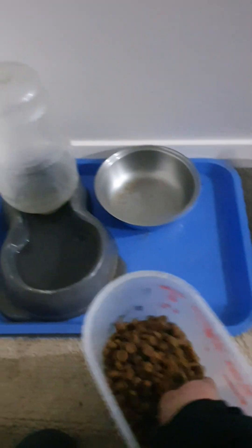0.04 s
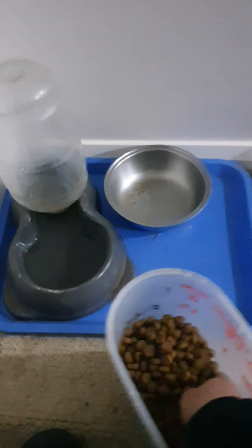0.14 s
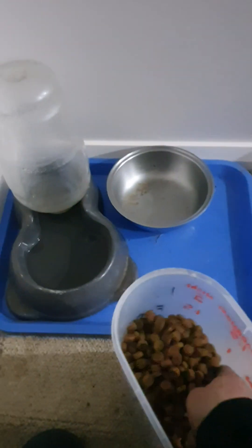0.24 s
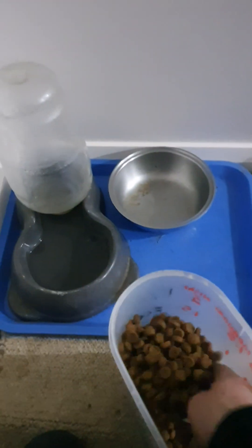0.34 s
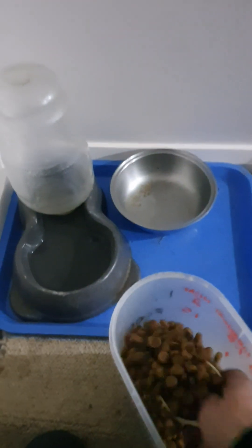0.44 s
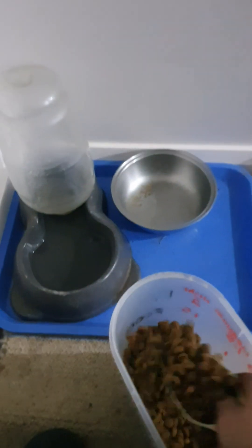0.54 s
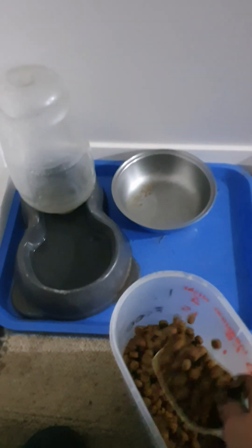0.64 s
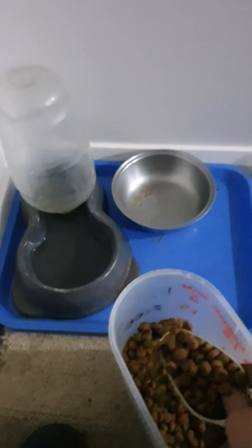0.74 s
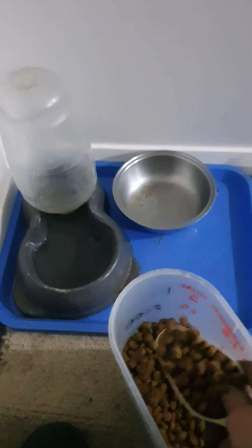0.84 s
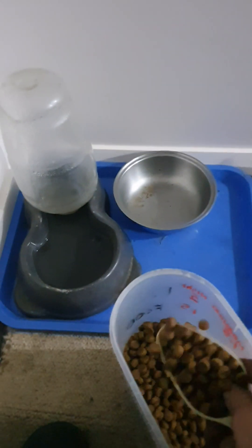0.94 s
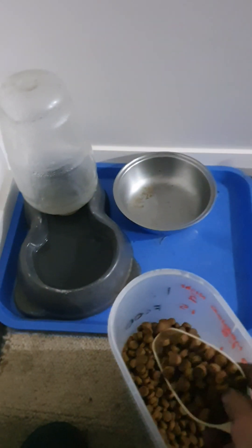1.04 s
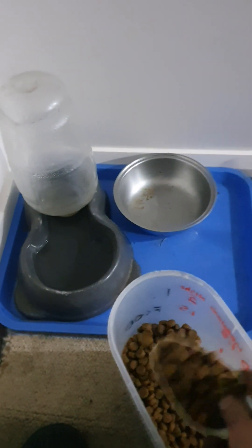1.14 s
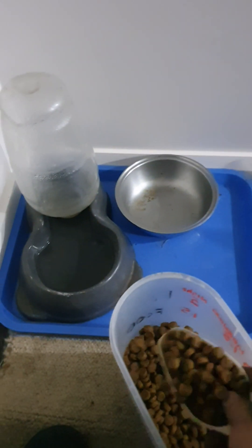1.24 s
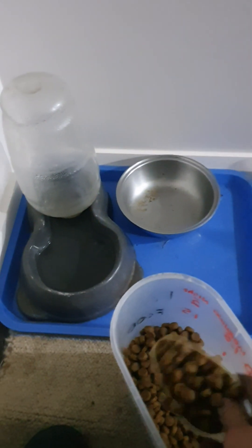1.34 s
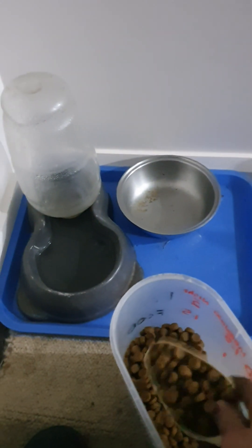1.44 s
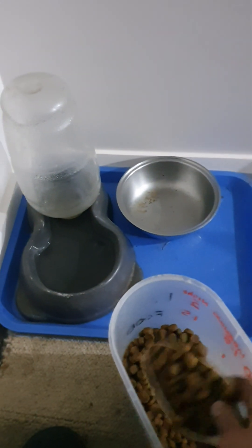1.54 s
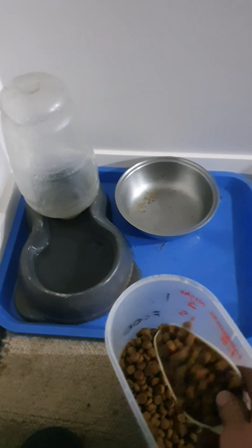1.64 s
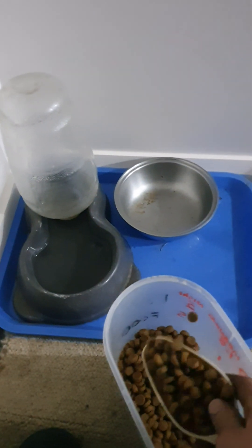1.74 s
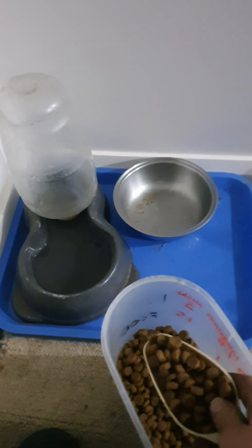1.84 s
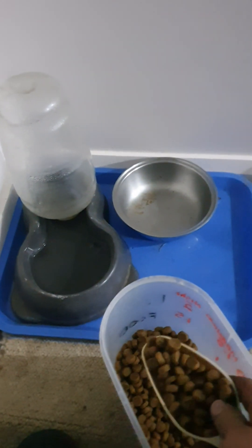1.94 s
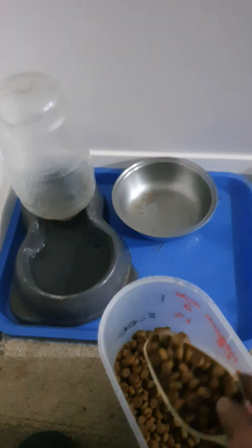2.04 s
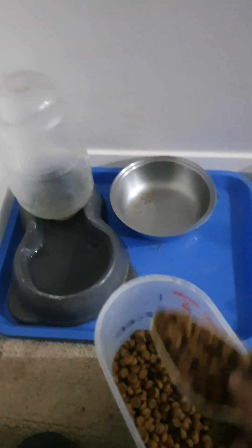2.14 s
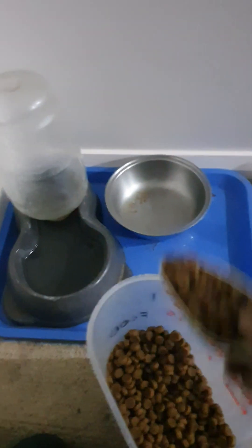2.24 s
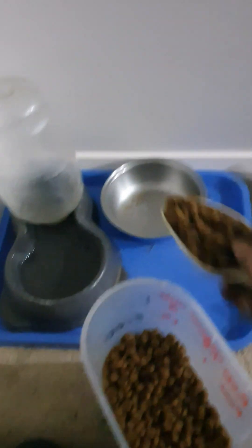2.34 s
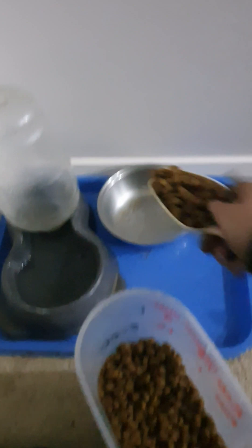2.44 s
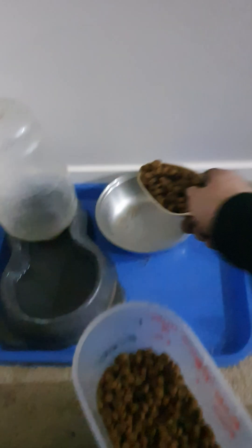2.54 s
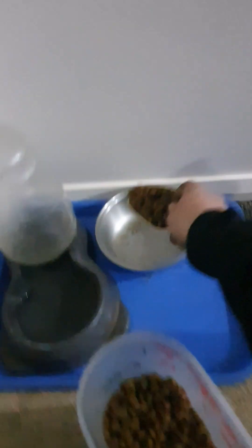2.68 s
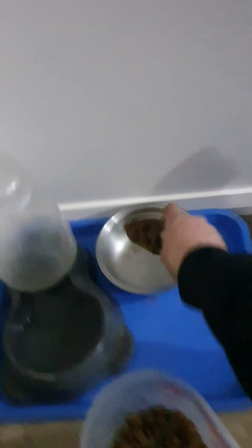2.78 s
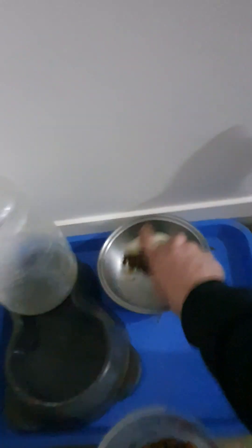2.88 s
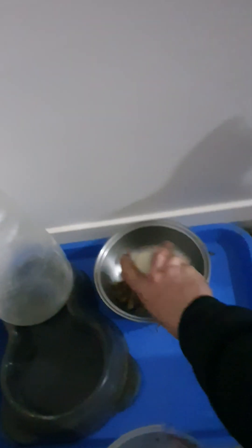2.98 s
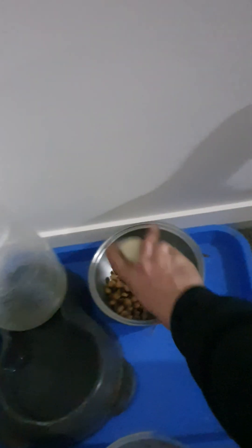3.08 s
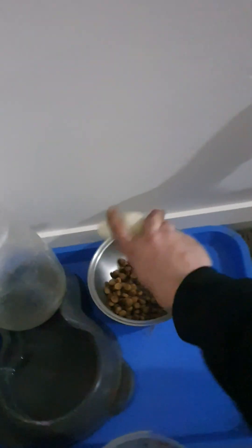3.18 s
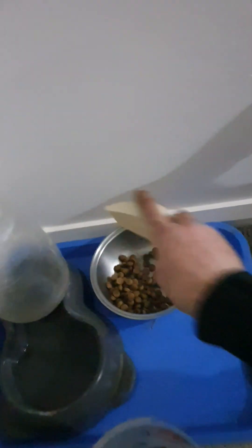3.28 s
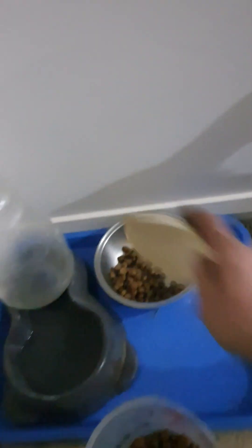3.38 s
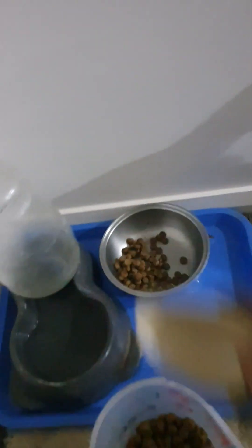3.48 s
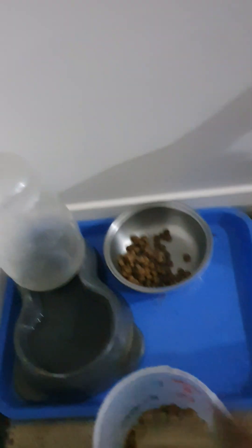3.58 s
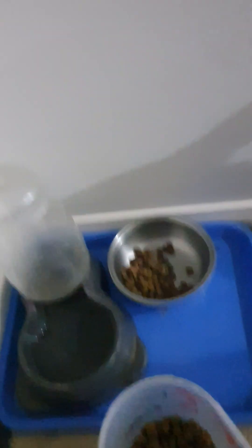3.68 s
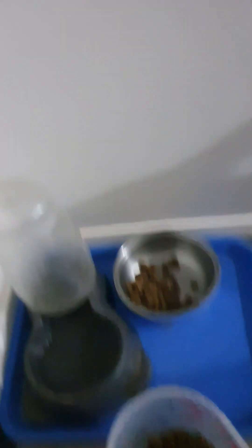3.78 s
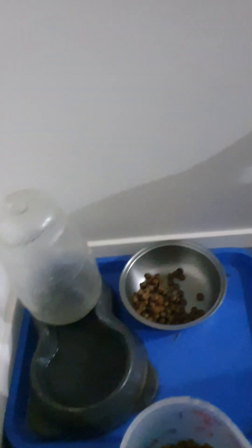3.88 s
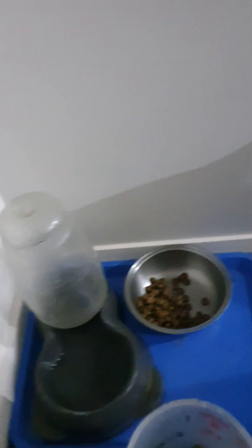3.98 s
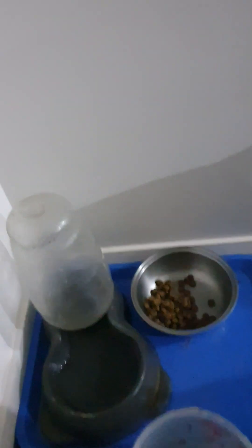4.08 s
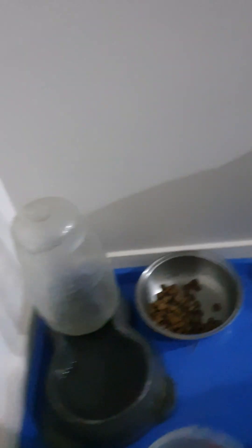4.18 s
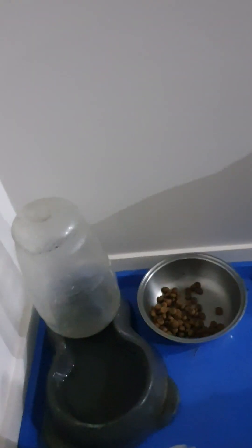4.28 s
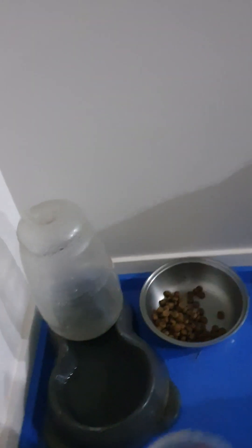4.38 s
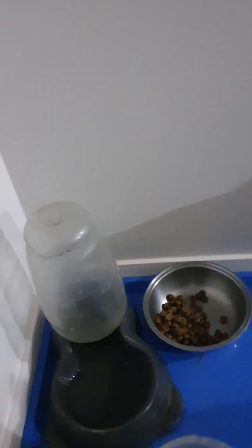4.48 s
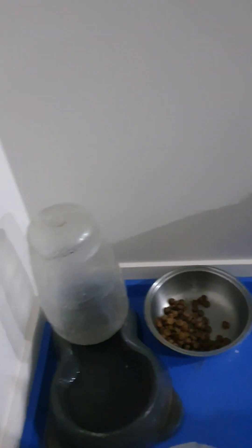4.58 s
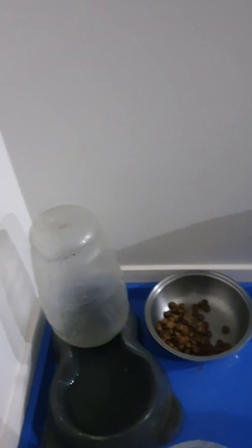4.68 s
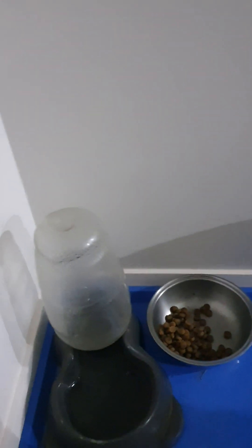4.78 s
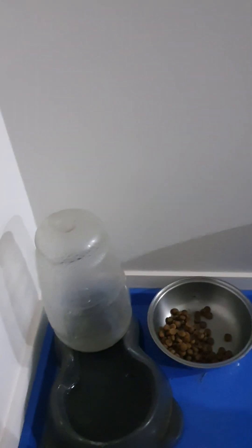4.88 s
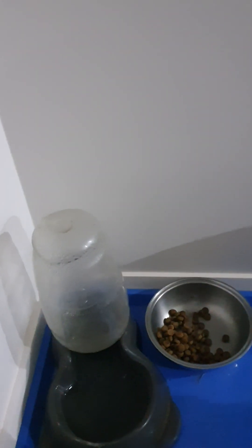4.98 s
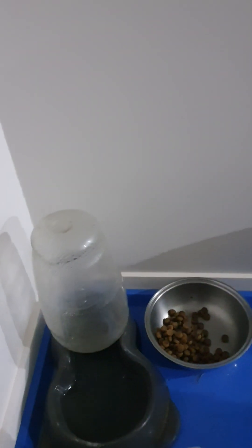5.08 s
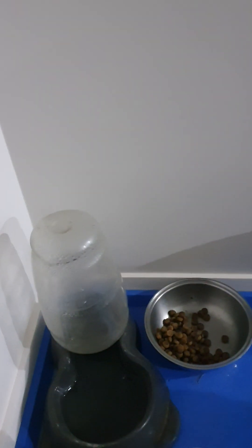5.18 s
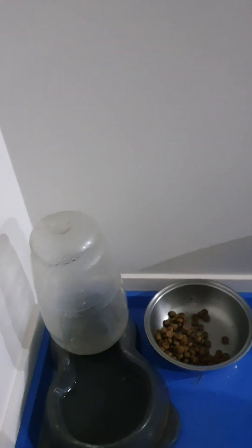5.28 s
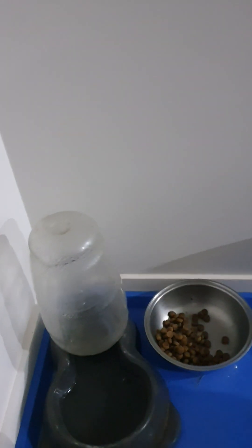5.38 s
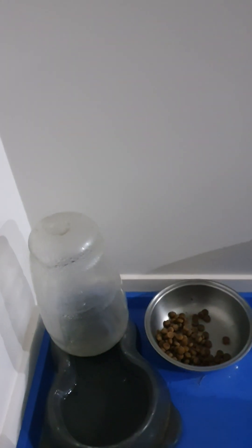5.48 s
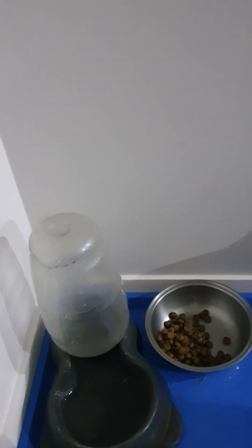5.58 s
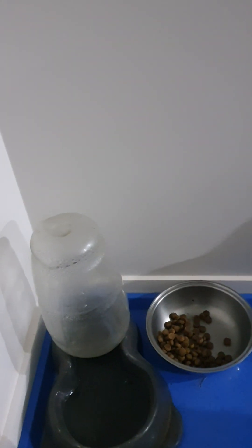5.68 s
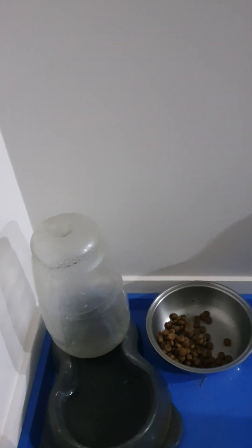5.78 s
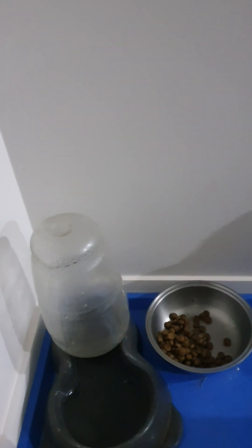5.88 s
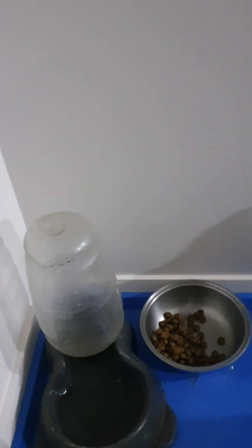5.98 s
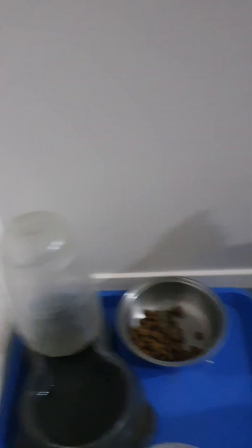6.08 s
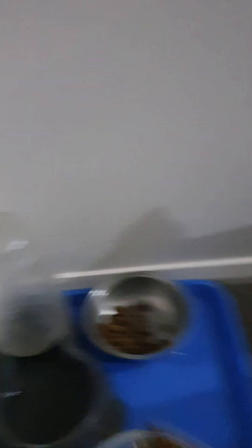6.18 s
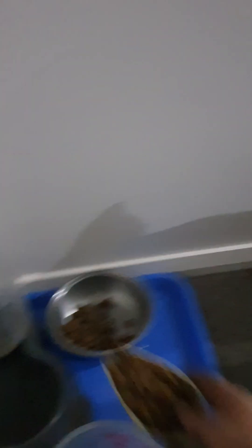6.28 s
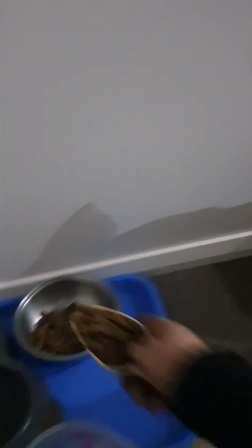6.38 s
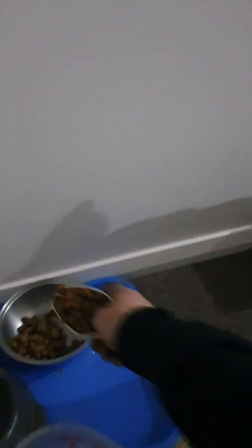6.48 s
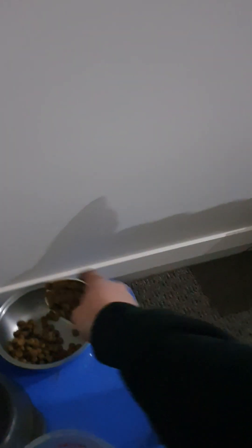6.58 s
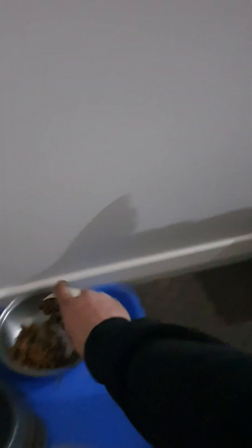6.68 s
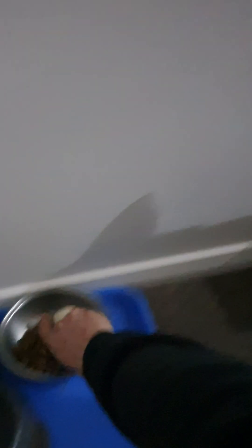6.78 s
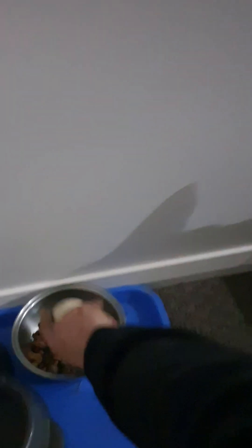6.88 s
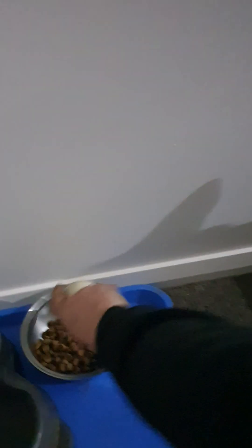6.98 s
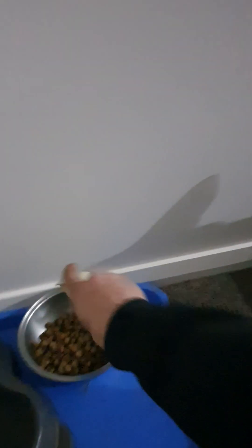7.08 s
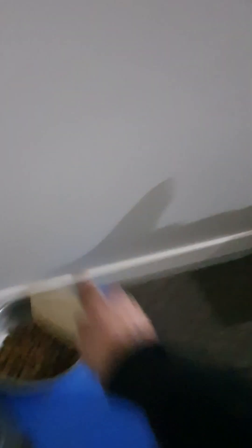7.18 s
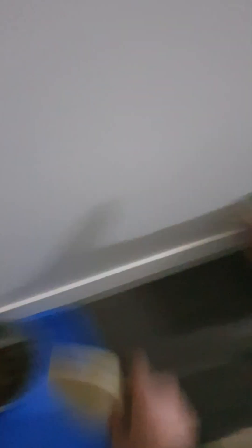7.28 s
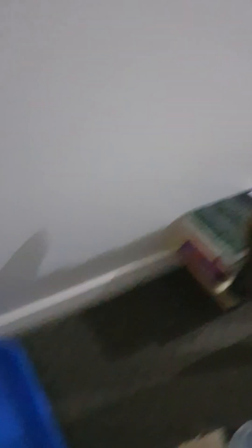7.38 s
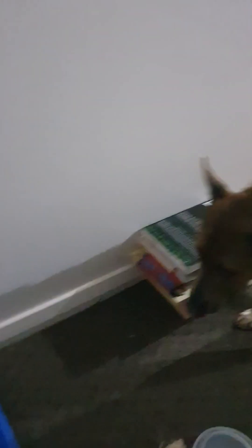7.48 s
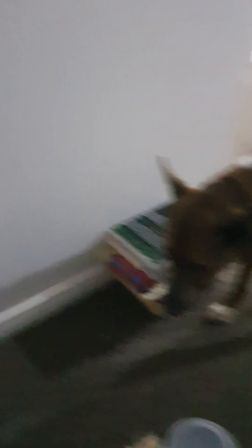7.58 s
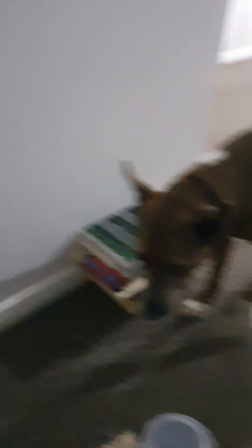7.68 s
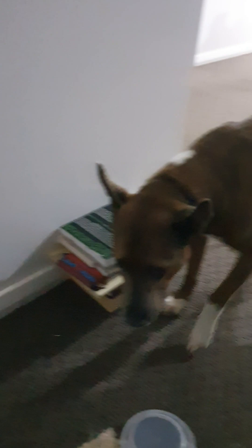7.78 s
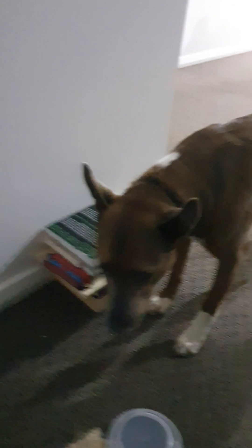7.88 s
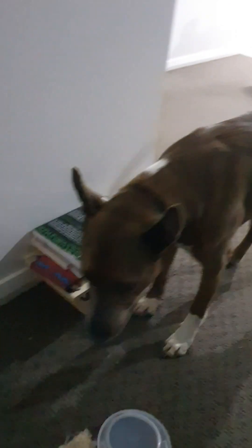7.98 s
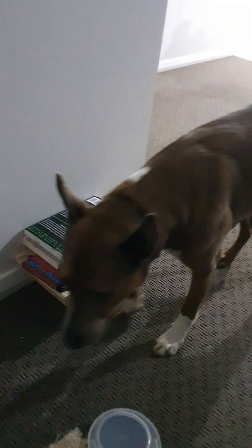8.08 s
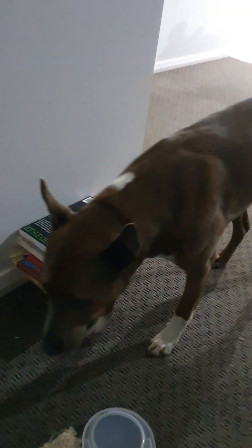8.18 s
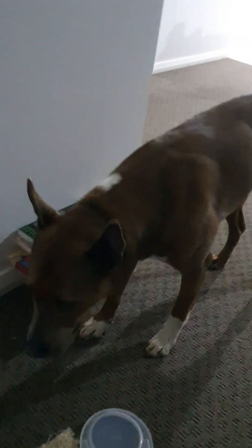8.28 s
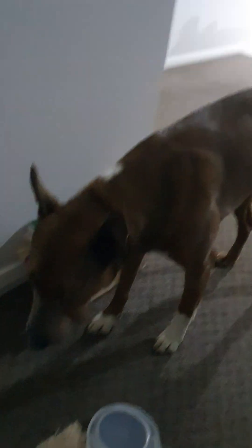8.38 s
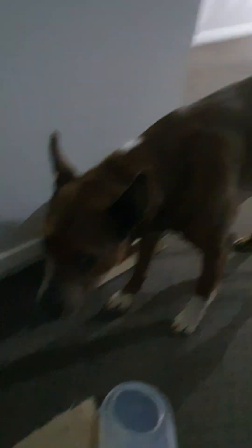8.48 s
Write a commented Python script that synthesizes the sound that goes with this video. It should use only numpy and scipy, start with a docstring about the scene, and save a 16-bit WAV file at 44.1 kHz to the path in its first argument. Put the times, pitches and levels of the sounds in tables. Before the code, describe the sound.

Close stereo phone pickup in a quiet carpeted room, with a faint low hum and soft rumble swelling at handling bumps. From 0 to about 0.95 s a scoop digs into dry pellets in a thin plastic jug: grainy crunching, dull hollow booms and short rattles. Until about 1.9 s it is shaken level with scattered light knocks. Near quiet follows, with a slight slide of pellets, then at 3.0 s they pour into a steel bowl, a bright, hard metallic clatter fading within half a second, the rim ringing briefly. A sleeve rustles around 3.6 s. A second, busy dig runs 3.95-4.75 s, then lighter shaking knocks to 6.2 s. At 6.8 s another short pour lands, duller on the heap. Cloth swishes near 7.4 s, the scoop clacks down at 7.5 s, and a dog's small metal tag clinks with thin, fluttering high rings from 7.3 to 8.4 s.

```python
"""Scooping pellets into a steel bowl

In a carpeted room, close to a phone with two microphone ports, a scoop digs dry pellets from a plastic jug,
is shaken level and tipped into a steel bowl, twice. Short grit bursts drive the jug wall and the bowl.
A sleeve rustles as swelling noise, a dog's metal tag clinks in decaying modes, the scoop clacks as it is
put down; behind lie a faint filtered-noise hum and a rumble that swells when the phone is jolted."""
import sys
import numpy as np
from scipy import signal
from scipy.fft import rfft, irfft
from scipy.io import wavfile
from scipy.ndimage import uniform_filter1d, map_coordinates

SR = 44100
rng = np.random.default_rng(int(sys.argv[2]) if len(sys.argv) > 2 else 0)


def bounce(signal):
    """Save signal as a 16-bit WAV file at the path given by the first command-line argument."""
    frames = np.transpose(np.atleast_2d(signal))
    limited = np.clip(frames, -1, 1)
    pcm = np.round(limited * 32767).astype(np.int16)
    wavfile.write(sys.argv[1], SR, pcm)


N = 376173
T = np.arange(N) / SR


def undb(db):
    """Amplitude factor of a level in dB."""
    return 10 ** (np.asarray(db) / 20)


def unit(x):
    """Scale to an rms of 1."""
    return x / np.sqrt(np.mean(x ** 2))


def pair(alike):
    """Noise for two ports that share a part of its power."""
    share = np.clip(alike, 0, 1)
    common = np.sqrt(share) * rng.standard_normal(N)
    return common + np.sqrt(1 - share) * rng.standard_normal((2, N))


def spikes(start_s, size):
    """Impulses of the given sizes at the given times."""
    x = np.zeros(N)
    np.add.at(x, np.clip((np.asarray(start_s) * SR).astype(int), 0, N - 1), size)
    return x


def burst(x, rise_s, fall_s):
    """Envelope that swells and fades after each spike, with the spike's height as its scale."""
    fall = signal.lfilter([1], [1, -np.exp(-1 / (fall_s * SR))], x)
    rise = max(int(rise_s * SR), 1)
    return uniform_filter1d(fall, rise, origin=(rise - 1) // 2)


def colour(x, points):
    """Causal filter with the given spectrum, from the cepstrum of its log gain."""
    hz, db = np.transpose(points)
    bins_hz = np.maximum(np.fft.rfftfreq(4096, 1 / SR), 1)
    log_gain = np.interp(np.log(bins_hz), np.log(hz), db) * np.log(10) / 20
    cepstrum = irfft(log_gain)
    # folding onto positive times gives minimum phase
    cepstrum[1:2048] *= 2
    cepstrum[2049:] = 0
    return signal.fftconvolve(x, irfft(np.exp(rfft(cepstrum))))[:N]


def ring(x, hz, width_hz):
    """Resonance with gain 1 at its centre."""
    return signal.lfilter(*signal.iirpeak(hz, hz / width_hz, SR), x)


def mode(x, hz, t60_s):
    """A freely decaying mode; an impulse of 1 starts its decay from amplitude 1."""
    pole = np.exp(2j * np.pi * hz / SR - np.log(1000) / (t60_s * SR))
    return signal.lfilter([1], [1, -pole], x).imag


def curves(tables):
    """Columns of several tables over time; the first falls silent outside their spans."""
    rows = []
    for t in map(np.array, tables):
        before = np.r_[t[0, 0] - .002, -120, t[0, 2:]]
        after = np.r_[t[-1, 0] + .002, -120, t[-1, 2:]]
        rows += [before, *t, after]
    start_s, *columns = np.transpose(rows)
    return np.array([np.interp(T, start_s, c) for c in columns])


def band_levels(rattle_db, thud_db, hard_db, grit_slope):
    """Levels of thud, rattle, click and grit; hardness raises the upper two."""
    return rattle_db + thud_db, rattle_db, rattle_db + hard_db, rattle_db + grit_slope * hard_db


def pellets(bed, hits, body, edges_hz, rate, spread_db, own_db, rise_s, scrape_s, bed_db, hit_db,
            grit_slope, settle_db, settle_s, alike):
    """Contacts are short grit bursts driving the body in four bands; neighbours settle after each hit."""
    count = int(rate * N / SR)  # rate is contacts per second
    contact_s = rng.uniform(0, N / SR, count)
    size_db = spread_db * rng.exponential(size=count)
    hit_s, *columns = np.transpose(hits)
    bed_bands = band_levels(*curves(bed), grit_slope)
    hit_bands = band_levels(*columns, grit_slope)
    response = body(np.eye(1, 4096)[0])[:4096]
    out = 0
    for k, (stir_db, blow_db) in enumerate(zip(bed_bands, hit_bands)):
        band = signal.butter(3, edges_hz[k:k + 2], "bandpass", fs=SR, output="sos")
        part = signal.sosfilt(band, response)
        contacts = spikes(contact_s, undb(size_db + own_db * rng.standard_normal(count)))
        crowd = unit(burst(contacts, rise_s, scrape_s[k]))
        blows = spikes(hit_s, undb(blow_db + hit_db[k]))
        settling = undb(settle_db) * burst(blows, rise_s, settle_s)
        stir = undb(stir_db + bed_db[k]) + settling
        drive = crowd * stir + burst(blows, rise_s, scrape_s[k])
        # contacts lie all over the wall, so the ports hear short waves less alike
        grit = drive * pair(alike[k])
        out = out + signal.oaconvolve(grit, [part / np.linalg.norm(part)])[:, :N]
    return out


# spectrum of the house hum: pitch_hz, relative level_db (per Hz)
HUM_SPECTRUM = [(76, -55), (130, -25), (191, -11.5), (229, -4), (259, -10.5), (351, -9.5), (448, -20),
                (526, -14), (607, -19.5), (1010, -29), (1210, -30), (1740, -40.5), (16500, -78.5)]
# spectrum of the rumble: pitch_hz, relative level_db (per Hz)
RUMBLE_SPECTRUM = [(12, -38), (25, -17), (58, -0.5), (75, -4.5), (100, -2), (140, -11.5), (200, -55.5)]
# the hand or the floor jolts the phone: loudest_s, level_db (added to the steady rumble as amplitude)
JOLTS = [(0.0, -40), (1.54, -55), (3.11, -48.5), (4.01, -42), (4.47, -50), (4.61, -49), (6.58, -48.5),
         (6.86, -44), (7.34, -64)]
HUM_DB, RUMBLE_DB = -55, -58
JOLT_RISE_S, JOLT_FALL_S = 0.04, 0.08


def hum():
    """Low house hum, much alike at both ports, over a rumble that swells with every jolt."""
    mid, side = (unit(colour(rng.standard_normal(N), HUM_SPECTRUM)) for _ in range(2))
    # the low part differs little between the ports
    side = signal.lfilter(*signal.butter(1, 900, "highpass", fs=SR), side) + undb(-18.5) * side
    jolts = 0
    for loudest_s, db in JOLTS:
        away = np.maximum((loudest_s - T) / JOLT_RISE_S, (T - loudest_s) / JOLT_FALL_S)
        jolts = jolts + undb(db) * np.exp(-away)
    rumble = unit(np.array([colour(x, RUMBLE_SPECTRUM) for x in pair(0.93)]))
    return undb(HUM_DB) * (mid + side * np.array([[1], [-1]])) + rumble * (undb(RUMBLE_DB) + jolts)


# strokes of the sleeve: loudest_s, swell_s, fade_s, level_db (before band gains), sheen_db (re level)
SLEEVE_STROKES = [(2.65, .3, 0.074, -79, -0.5), (3.62, .15, 0.21, -65.5, -5.5), (6.4, .15, .2, -77, 2),
                  (6.749, 0.14, .03, -72.5, 2), (7.4, 0.12, 0.21, -62.5, -8), (7.9, 0.23, 0.23, -77, 0.5),
                  (8.28, 0.25, 0.18, -71.5, -1)]
# spectrum of the cloth: pitch_hz, relative level_db (per Hz)
CLOTH_SPECTRUM = [(470, -40), (800, -13), (1650, -9), (1940, -8.5), (2180, -19.5), (5700, -16), (8330, -28),
                  (12200, -19.5), (15500, -27.5), (16500, -47.5)]


def sleeve():
    """Soft cloth hiss with a slight flutter; each stroke swells and fades with its own share of high sheen."""
    flutter = unit(uniform_filter1d(rng.standard_normal(N), SR // 30))
    hiss = np.array([colour(x + undb(6.0) * ring(x, 2000, 120), CLOTH_SPECTRUM) for x in pair(0.25)])
    low, high = (unit(signal.sosfilt(signal.butter(3, 6500, kind, fs=SR, output="sos"), hiss))
                 for kind in ("low", "high"))
    rustle = 0
    for loudest_s, swell_s, fade_s, db, sheen_db in SLEEVE_STROKES:
        away = np.maximum((loudest_s - T) / swell_s, (T - loudest_s) / fade_s)
        level = np.exp(-away ** 2) * undb(db)
        rustle = rustle + level * (undb(6.5) * low + undb(sheen_db) * undb(5.0) * high)
    return undb(0.87 * flutter) * rustle


# clinks of the tag, levels before offsets:
# start_s, third_pair_db (also sets the tick), lowest_pair_db, second_pair_db, top_pair_db
CLINKS = [(7.3257, -33, -54, -48, -56), (7.5203, -52, -53, -67, -57), (7.5418, -38, -59, -53, -48),
          (7.6544, -44.5, -50.5, -81, -61), (7.7732, -38.5, -48.5, -54.5, -50), (8.076, -57, -63, -70, -86),
          (8.1901, -34, -53.5, -54.5, -56)]
# close pairs of plate modes, from low to high: pitch_hz, level_db (re clink), t60_s
TAG_MODES = [(2272, -4.5, 1.38), (2230, -9.5, 1.02), (6190, 3.5, 0.53), (6200, -7, 0.36), (11560, 0, 0.2),
             (11600, -26, 0.18), (15300, -7, 0.12), (15260, 2, 0.13)]
TAG_REST_S = 8.37  # the tag settles against fur


def tag():
    """Clinks strike the split modes of a small metal plate and tick; it swings, so the rings flutter."""
    start_s, third_db, low_db, second_db, top_db = np.transpose(CLINKS)
    blows_db = np.repeat([low_db - 5, second_db + 10.0, third_db, top_db + 7], 2, axis=0)
    rings = 0
    for (hz, db, t60_s), blow_db in zip(TAG_MODES, blows_db):
        wander = uniform_filter1d(rng.standard_normal(N), SR // 25)
        swing = undb(4.0 * unit(uniform_filter1d(wander, SR // 25)))
        rings = rings + swing * mode(spikes(start_s, undb(blow_db + db)), hz, t60_s)
    rings = rings * np.exp(-np.maximum(T - TAG_REST_S, 0) / 0.015)
    tick = burst(spikes(start_s, undb(third_db - 7)), .0002, 0.001)
    return rings + tick * np.diff(pair(0.56), prepend=0)  # differencing brightens the tick


# spectrum of the scoop: pitch_hz, relative level_db (per Hz)
SCOOP_SPECTRUM = [(150, -30), (400, 3), (900, -3.5), (1800, -5), (2500, -19), (3500, -9), (5000, -23),
                  (16000, -53)]
CLACK_S, CLACK_DB = 7.518, -23  # the scoop is put down; scale of the burst


def scoop():
    """One dry clack of hard plastic, a short burst of coloured noise."""
    grit = unit(np.array([colour(x, SCOOP_SPECTRUM) for x in pair(0.32)]))
    return grit * burst(spikes([CLACK_S], undb(CLACK_DB)), 0.0015, 0.004)


# Levels below are before the band trims in jug().
# the scoop digs into the pellets, twice: start_s, rattle_db, wall_thud_db (re rattle), hardness_db
DIG = [
    [(0.0, -26, 2.5, -7.5), (.05, -26, 6, -6), (.13, -42, 4, -11.5), (.31, -30.5, -0.5, -10.5),
     (.42, -35.5, 2.5, -6.5), (.57, -30.5, 1.5, -5), (.7, -40, 3.5, -8), (.96, -53, 3, -8)],
    [(3.93, -55, -3, -5), (3.955, -28.5, -3.5, -1), (4.08, -31, 0, -9), (4.2, -31, -3, -9.5),
     (4.28, -41, 0, -9.5), (4.42, -37, 6, -5), (4.55, -32, -5, -7), (4.6, -28.5, -0.5, -6.5),
     (4.75, -58, 6.5, -13.5)],
]
# the full scoop is shaken level, twice: start_s, rattle_db, wall_thud_db (re rattle), hardness_db
SHAKE = [
    [(.97, -56, 8, -15), (1.04, -62.5, 13, -10), (1.2, -53, -1, -6), (1.42, -51.5, 0.5, -12),
     (1.6, -43.5, 5, -7), (1.74, -51, 1, -1.5), (1.88, -67, 6, -10), (2.0, -71, 5, -3)],
    [(4.76, -49.5, -1, -2.5), (4.86, -50, -4, -3.5), (4.96, -41, -6, -9), (5.17, -54, -1.5, -8),
     (5.5, -55, 3, -14), (5.78, -53.5, -0.5, -13), (5.99, -71, 4, -18), (6.15, -54.5, -0.5, -9),
     (6.3, -70.5, 6, -6)],
]
# pellets slide in the tilted scoop before each pour: start_s, rattle_db, thud_db (re rattle), hardness_db
SLIDE = [
    [(2.67, -72, -4.5, -6), (2.69, -53.5, -1.5, 2.5), (2.946, -52.5, -0.5, 1), (2.965, -58, 0.5, 0.5)],
    [(6.7, -64.5, -0.5, 0.5), (6.766, -49.5, 2, 2), (6.774, -37, 2, 0), (6.796, -35.5, -1, 5)],
]
# single knocks on the plastic: start_s, rattle_db, wall_thud_db (re rattle), hardness_db
KNOCKS = [(0.037, -22.5, 3, -9), (0.073, -30, 9.5, -9), (0.238, -32.5, -4, -6), (0.511, -30, -14, -13),
          (0.528, -21.5, -21, -7), (0.564, -18, -10, -4.5), (0.673, -44, 5, -17), (0.697, -33.5, -15, 3.5),
          (0.71, -21.5, -16, -6), (0.72, -21.5, -22, -22), (0.736, -35, -2, -5), (0.779, -20, -11, -12.5),
          (0.798, -30.5, -10, -3.5), (0.849, -29, 2, -17), (0.876, -32, 1, -4.5), (0.894, -37, 3, -14),
          (0.909, -20.5, 3.5, -5), (0.922, -31, 0, -9), (0.946, -32, -8, -13), (0.961, -26.5, -16, 2),
          (1.066, -30, -1, -10), (1.084, -30, -8, -15), (1.129, -43, 6, -17), (1.156, -31.5, -1, -4),
          (1.188, -30.5, -31, -35), (1.209, -28, -24, -17), (1.224, -25, -26, -8), (1.245, -38, -15, -3),
          (1.263, -43.5, 3, 5), (1.294, -26.5, -20, -20), (1.347, -28.5, -26, -8), (1.356, -28.5, -26, -10),
          (1.385, -31, 5, -8), (1.409, -31, -22, -14), (1.428, -23.5, -6, -5), (1.492, -21, -0.5, -15),
          (1.511, -31, -19, -19), (1.536, -28, 0, -1.5), (1.561, -27, -9, -8), (1.599, -22, -7, -9.5),
          (1.627, -25, -19, -4), (1.695, -21.5, -2, -19), (1.714, -29, -32, -6), (1.732, -25.5, -8.5, -12),
          (1.786, -28.5, -17, -8.5), (1.821, -26.5, -13, -8), (1.864, -39.5, 0, 5), (1.877, -34.5, -16, -6),
          (2.799, -42, -10, -4), (2.891, -41.5, -18, -0.5), (3.932, -33.5, -14, -2),
          (3.957, -20.5, -14, 1.5), (4.007, -17, -10, -4.5), (4.043, -19, -6.5, -5), (4.108, -21, -10, -14),
          (4.161, -19, -5, -9.5), (4.195, -17.5, -7.5, -11.5), (4.245, -21, -25, -17), (4.398, -40, 7, -11),
          (4.43, -33, 13, -9), (4.452, -23.5, -7, -11.5), (4.55, -21.5, -13, -11), (4.592, -15.5, -7, -7),
          (4.623, -31, -3, -1.5), (4.691, -32, -13, -11), (4.727, -39, 3, -17), (4.812, -35, -24, -14),
          (4.828, -36, -28, -29), (4.869, -37.5, -24, -10), (4.889, -29, -20, -4), (4.914, -28, -11, 0),
          (4.944, -21, -27, -10), (4.985, -24.5, -17, -10), (5.024, -27, -17, -10.5), (5.065, -29, -20, -4),
          (5.105, -43, -3, 3), (5.13, -36.5, -8, 1.5), (5.14, -26, -5, -1.5), (5.231, -34.5, -13, -10),
          (5.254, -33, -9, 0), (5.298, -35, -10, -1), (5.318, -37.5, -10, -14), (5.357, -25.5, -4.5, -10),
          (5.382, -33, -18, -0.5), (5.425, -25.5, -2.5, -18), (5.44, -27, -20, -6.5), (5.5, -40, 4, 1.5),
          (5.513, -21, 0.5, -4.5), (5.621, -33, -7, -14), (5.644, -26, -15, -0.5), (5.654, -25, -18, -8),
          (5.722, -30, -20, -10), (5.772, -36, -16, -15), (5.819, -27.5, -26, -14), (5.86, -36, -17, -16),
          (5.884, -42, -8, -2), (5.921, -33, -20, -3), (5.934, -35.5, -29, -13), (6.042, -49.5, 0, 4),
          (6.075, -32, -21, -10.5), (6.111, -25, -18, -5), (6.169, -45, -9, -0.5)]
# spectrum of the jug wall: pitch_hz, relative level_db (per Hz)
JUG_SPECTRUM = [(88, -52.5), (150, -15.5), (210, -8.5), (293, 0.5), (349, -2.5), (549, -18.5), (830, -16.5),
                (1410, -16.5), (2090, -13.5), (3100, -24.5), (4250, -22), (8130, -35.5), (12500, -30),
                (15600, -43), (16500, -58)]
# resonances of the jug wall: pitch_hz, width_hz, level_db
JUG_RINGS = [(246.3, 120, -7.5), (314, 67, 1.5), (383, 110, -3), (850, 97, -3.5), (1124, 260, 1.5),
             (1860, 510, 5.5), (1990, 240, 0), (4190, 270, -2.5)]
# edges of the thud, rattle, click and grit bands [Hz]
JUG_EDGES_HZ = (150, 600, 3000, 7500, 16000)


def jug_wall(x):
    """Resonances of thin plastic over its broad spectrum."""
    rings = sum(undb(db) * ring(x, hz, width_hz) for hz, width_hz, db in JUG_RINGS)
    return colour(undb(1.0) * x + rings, JUG_SPECTRUM)


def jug():
    """Pellets stir and knock the thin plastic wall: a dull boom and short rattling rings."""
    return pellets(
        sorted(DIG + SHAKE + SLIDE), KNOCKS, jug_wall, JUG_EDGES_HZ,
        rate=920, spread_db=2.5, own_db=5.5, rise_s=0.0021, scrape_s=(0.004, 0.003, 0.0023, 0.0019),
        bed_db=(-2.0, -2.0, -1.5, -8.5), hit_db=(-1.5, -2.5, 3, -8.5), grit_slope=1.25,
        settle_db=-21.5, settle_s=0.02, alike=(0.96, 0.52, 0.37, 0.12))


# Pour and drop levels are before the band trims in bowl().
# each pour: start_s, swell_s, peak_db, fall_db_per_s, thud_db (re rattle), hardness_db
POURS = [(2.981, 0.011, -23, 116.5, -5.5, 3), (6.8, 0.03, -21, 142.5, 2.5, 1.5)]
# single pellets landing in the bowl: start_s, rattle_db, thud_db (re rattle), hardness_db
DROPS = [(2.975, -13.5, -22, -3), (2.9833, -11.5, -22, -1.5), (3.0078, -14.5, -19, -1),
         (3.027, -12.5, -17, -2.5), (3.0494, -21, -15, 1.5), (3.0752, -17.5, -18.5, -2.5),
         (3.096, -32.5, -11, 5.5), (3.1217, -15, -21, -8.5), (3.206, -32.5, -10, -4.5),
         (3.2304, -28.5, -30, -9), (3.2602, -47.5, -12, 8.5), (3.2974, -49, -21, -17),
         (3.3568, -46.5, -7, -40), (6.7731, -20, -2.5, -7), (6.798, -26, -1, 9.5), (6.8125, -21, -9.5, 2.5),
         (6.8306, -20.5, -12, 0.5), (6.849, -20, -12, -0.5), (6.8604, -22, -9, 1.5), (6.921, -27.5, -7, 4),
         (6.9434, -33, -5, 1), (7.0046, -27, -11, -3)]
# spectrum of the pellets in the bowl: pitch_hz, relative level_db (per Hz)
HEAP_SPECTRUM = [(88, -44), (150, -14), (409, -1.5), (460, -11.5), (518, -1.5), (953, -12), (1970, -6),
                 (3700, -11), (4250, -6.5), (8290, -16), (11400, -9), (15600, -19), (16500, -43.5)]
# resonances of the wall under the pellets: pitch_hz, width_hz, level_db (before the change per scoop)
BOWL_CLANK = [(1310, 180, -3), (2016, 90, -1.5), (3340, 80, 0.5), (4180, 110, -0.5), (4170, 80, 5),
              (5720, 290, -5), (6620, 74, 8), (10840, 63, -0.5), (12600, 80, -12)]
# modes of the free rim: pitch_hz, first_blow_db, second_blow_db, t60_s
BOWL_RIM = [(1136, -67, -39.5, 0.44), (2220, -57.5, -30, 0.52), (3030, -48, -51, 0.74),
            (3350, -46, -50, 0.72), (3576, -48, -66, 0.61), (3720, -51, -66, 0.49),
            (3930, -62.5, -66, 0.56), (3907, -50.5, -50, 0.62), (4280, -44, -46, 0.33),
            (4640, -59, -66, .5), (4996, -62, -46, 0.37), (6350, -50, -57, .25)]
# a pellet hits the bare rim, twice: start [s]
RIM_BLOWS_S = (3.117, 6.922)
# edges of the thud, rattle, click and grit bands [Hz]
BOWL_EDGES_HZ = (150, 1000, 3000, 7500, 16000)
POUR_S, POUR_START_DB = 0.5, -12.5  # length of the fall; level at the start re peak
BARE_STEEL_DB, HEAPED_DB = 7.5, -7  # hardness added at the start and at the end of a pour
HEAPED_THUD_DB = 7  # thud added at the end
SECOND_SCOOP_S = 5  # from here the wall clanks less


def bowl():
    """Steel wall clanks and the rim rings on; the heap of the first scoop muffles the second."""
    pours = []
    for start_s, swell_s, db, fall, thud_db, hard_db in POURS:
        peak_s = start_s + swell_s
        pours.append([
            (start_s, db + POUR_START_DB, thud_db, hard_db + BARE_STEEL_DB),
            (peak_s, db, thud_db, hard_db),
            (peak_s + POUR_S, db - fall * POUR_S, thud_db + HEAPED_THUD_DB, hard_db + HEAPED_DB)])
    clatter = pellets(
        pours, DROPS, lambda x: colour(x, HEAP_SPECTRUM), BOWL_EDGES_HZ,
        rate=1200, spread_db=3.0, own_db=2.5, rise_s=0.0023, scrape_s=(0.0057, 0.0019, 0.0038, 0.0055),
        bed_db=(-4, -4, -2, -4), hit_db=(-4, -3.5, -6, -3), grit_slope=1.7,
        settle_db=-26, settle_s=.02, alike=(0.92, 0.68, 0.5, 0.26))
    wall = clatter * undb(np.where(T > SECOND_SCOOP_S, -4, 5))
    clank = sum(undb(db) * ring(wall, hz, width_hz) for hz, width_hz, db in BOWL_CLANK)
    rim = sum(mode(spikes(RIM_BLOWS_S, undb(blows_db)), hz, t60_s) for hz, *blows_db, t60_s in BOWL_RIM)
    return clatter + clank + rim


# where the hand is: start_s, lag_samples (left behind right), pan_db (left minus right)
HAND_PLACE = [(0, 1.5, 0.5), (1.9, 6, 0.5), (2.6, -3.5, -2), (3.4, -4, 4.5), (3.9, 11, -2), (6.3, 12.5, -4),
              (6.7, -4, 0.1), (8.53, -4.5, -1)]


def scene():
    """Close sources move between the two ports, with a soft room answer, the sleeve and the hum."""
    near = jug() + bowl() + scoop() + tag()
    start_s, lag, pan_db = np.transpose(HAND_PLACE)
    lag, pan_db = np.interp(T, start_s, lag), np.interp(T, start_s, pan_db)
    i = np.arange(N)
    ports = [undb(side * pan_db / 2) * map_coordinates(x, [i - side * lag / 2], order=3)
             for side, x in zip((1, -1), near)]
    # the carpeted room answers softly; each port hears its own pattern
    t = T[:SR // 2]
    tail = undb(-36) * np.exp(-np.log(1000) * t / 0.22) * rng.standard_normal((2, len(t)))
    bright = signal.lfilter(*signal.butter(1, (400, 5000), "bandpass", fs=SR), near)
    room = signal.oaconvolve(bright, tail, axes=1)[:, :N]
    return np.array(ports) + room + sleeve() + hum()


TOP_HZ = 15900


def record(dry):
    """The left port is a little brighter and thinner; the phone rounds the loudest peaks and cuts the top."""
    treble = signal.lfilter(*signal.butter(2, 6000, "highpass", fs=SR), dry)
    ports = dry * undb([[-.6], [.6]]) + treble * np.array([[.2], [-.2]])
    rounded = np.tanh(1.15 * ports) / 1.15
    return signal.sosfilt(signal.ellip(12, .3, 100, TOP_HZ, fs=SR, output="sos"), rounded)


dry = scene()
out = record(dry)
bounce(out)
```